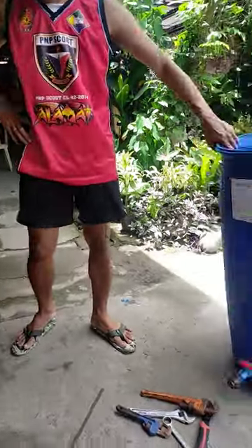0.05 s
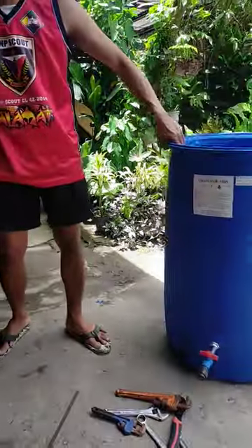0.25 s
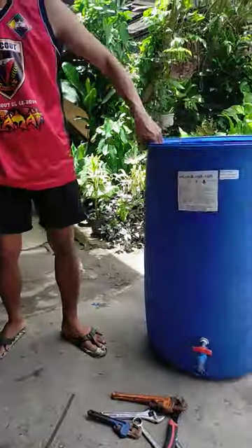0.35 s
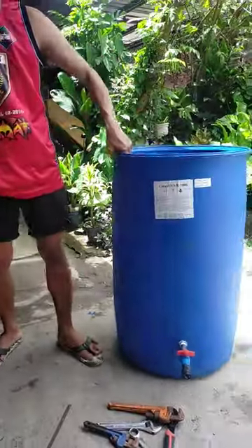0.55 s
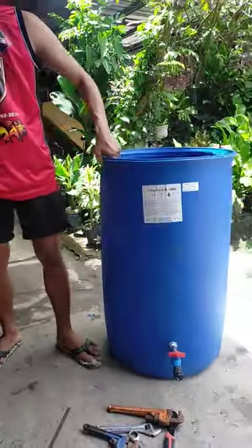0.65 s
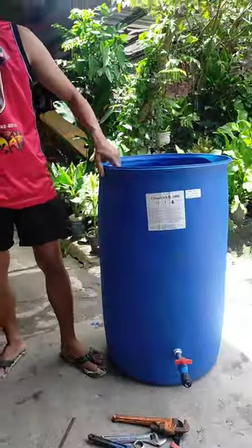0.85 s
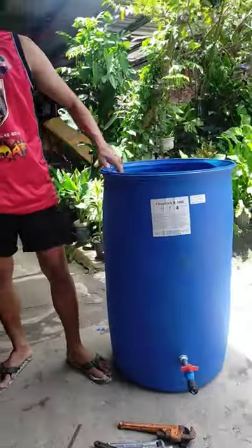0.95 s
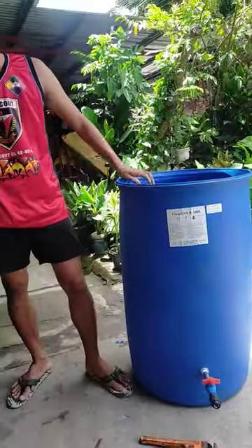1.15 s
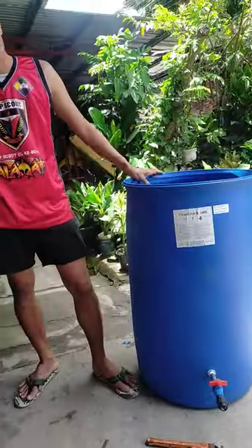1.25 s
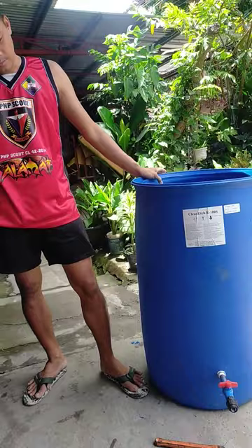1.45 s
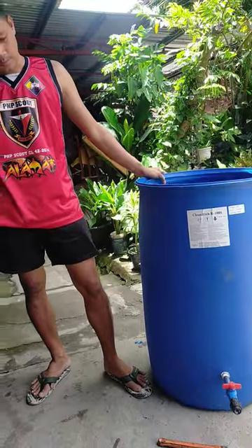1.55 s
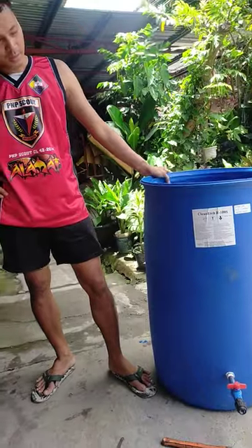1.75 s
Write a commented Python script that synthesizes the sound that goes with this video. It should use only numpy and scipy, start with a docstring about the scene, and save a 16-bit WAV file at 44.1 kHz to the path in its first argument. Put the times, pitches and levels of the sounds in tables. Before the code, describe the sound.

A hollow plastic barrel scrapes on gritty concrete, rattles with several sharp knocks and settles with low, soft bumps. One faint, dull tap follows. The microphone is close, outdoors, with quiet background rumble and hiss.

```python
"""An empty plastic drum is tipped and rolled on its bottom rim over a concrete yard.
The rim knocks four times, then chatters; each impact excites the damped modes of the hollow body.
Friction on grit makes a scrape, soft bumps set the air column humming, and the wall booms in its
two lowest flexural modes as it rolls and settles. A light, dull tap follows, over quiet outdoor noise."""
import sys
import numpy as np
from scipy import signal
from scipy.fft import rfft, irfft
from scipy.io import wavfile
from scipy.ndimage import uniform_filter1d

SR = 44100
rng = np.random.default_rng(int(sys.argv[2]) if len(sys.argv) > 2 else 0)


def waveform_to_disk(signal):
    """Save audio, clipped to [-1, 1], as 16-bit WAV at the path in sys.argv[1]."""
    frames = np.transpose(np.atleast_2d(signal))
    scaled = np.clip(frames, -1, 1) * 32767
    samples = np.round(scaled).astype(np.int16)
    wavfile.write(sys.argv[1], SR, samples)


N = 79380

# Spectral envelopes: f/Hz, relative level/dB
YARD_SPECTRUM = [(25, -10.5), (60, 5.5), (85, 1), (130, 1.5), (200, -9), (280, -6), (520, -19), (800, -16),
                 (2000, -18), (3200, -22), (5300, -30.5), (8000, -32), (10000, -37), (15500, -33.5)]  # outdoor air
TAP_SPECTRUM = [(100, -15), (250, -39), (370, 5), (480, -4.5), (720, -5.5), (950, -20), (1400, -18),
                (2500, -30), (8000, -42)]  # final tap
THUD_SPECTRUM = [(60, -19), (150, -21), (250, -1), (450, 4), (650, 1.5), (900, -7.5), (1400, -20),
                 (2500, -29), (8000, -32)]  # hollow body
RUB_SPECTRUM = [(30, -14), (60, 5), (200, -7), (500, 6.5), (900, -7), (1400, -2.5), (2300, -7.5),
                (4000, -14.5), (12000, -29)]  # rim sliding on concrete
SAND_SPECTRUM = [(200, -6), (1300, 3.5), (3000, -1.5), (5000, -5), (8000, -8.5), (10000, -5), (15500, -1)]  # crushed grit
CRACK_SPECTRUM = [(100, 6), (400, 1), (850, -3), (1400, 2.5), (2200, -1), (3000, 0), (4300, -7.5),
                  (7000, -11), (10000, -16), (15500, -18)]  # hard rim contact
# Normal modes of the drum: f/Hz, level/dB, T60/s
DRUM_MODES = [(173.4, -11, 0.6), (210, -5, 0.45), (268.4, -15.5, 0.46), (317.4, -4, 0.22),
              (355.5, -6, 0.45), (462, 2.5, 0.21), (603.5, -9.5, 0.29), (740, -11, 0.24), (1089, -4, 0.07),
              (1364, -11, 0.064), (1965, 7.5, 0.033), (2490, -9.5, 0.13), (3370, -21, 0.17)]
# Short resonances of the rim: f/Hz, width/Hz, boost/dB
RIM_RESONANCES = [(1084, 59, 5), (2060, 350, 3), (3200, 42, -0.5), (5550, 110, 3), (7950, 1200, 8)]
# Envelopes of the two lowest wall modes: t/s, lower level/dB, upper level/dB
BOOM_LEVELS = [(0, -60, -56), (.1, -66, -66), (.23, -67, -62), (.275, -57, -31.5), (.32, -51, -34),
               (.365, -31, -25.5), (.48, -31.5, -36), (.62, -39.5, -39.5), (.77, -29.5, -33.5),
               (.87, -40.5, -41), (.945, -31.5, -26), (1.04, -37.5, -33), (1.11, -50, -39),
               (1.18, -48, -48.5), (1.25, -89, -53.5), (1.8, -105, -77)]
# Soft contacts in tipping and settling: t/s, thud/dB, ring/dB, panel f/Hz, panel/dB, air column/dB
SOFT_BUMPS = [(0.271, -43, -44, 112, -21.5, -53), (0.743, -46, -34.5, 115.6, -21.5, -58),
              (.797, -38, -40, 174, -29.5, -35.5), (.925, -41.5, -42, 252.4, -31.5, -37.5)]
# Envelopes of the scrape: t/s, rub level/dB, grit level/dB
SCRAPE_LEVELS = [(0, -50, -54.5), (.085, -62.5, -52.5), (.1, -45.5, -41.5), (.19, -38.5, -45),
                 (.28, -27, -32.5), (.32, -30.5, -46.5), (.42, -42, -74), (.52, -49, -45),
                 (.70, -36.5, -47.5), (.78, -41, -46), (.86, -47.5, -53), (.91, -41, -60), (.96, -52, -64),
                 (1.02, -58.5, -74), (1.2, -70, -109)]
# Grit crushed under the rim: t/s, level/dB, duration/s
GRIT_CRACKS = [(0.0904, -29.5, 0.0027), (0.146, -37.5, 0.003), (0.16, -41.5, 0.012), (0.203, -25.5, 0.0073),
               (0.24, -37, 0.014), (0.275, -27.5, 0.0013), (0.302, -35, 0.0014), (0.623, -29.5, 0.0018),
               (0.664, -37, 0.0025), (0.712, -38, 0.0023), (0.738, -36.5, 0.006), (0.806, -53, 0.013),
               (0.889, -44.5, 0.027)]
# Rim impacts: t/s, crack/dB, relative treble/dB, thud/dB, ring/dB, ring tilt/(dB per octave),
# contact time/s, lower spot f/Hz, upper spot f/Hz, spot/dB, panel f/Hz, panel/dB
RIM_KNOCKS = [(0.3315, -18, -1.5, -18, -21, -3, 0.0059, 1270, 1620, -15.5, 606.6, -14),
              (.4470, -17, 2, -35, -19.5, 1, 0.013, 2072, 3350, -16.5, 1061, -37),
              (0.5335, -20.5, 1, -29, -23.5, 3.5, 0.0034, 2170, 2454, -16, 597, -20),
              (0.6068, -17.5, 0, -34, -22, 4, 0.0059, 1441, 1890, -17, 602, -16.5),
              (0.622, -50.5, 8, -26, -38, 0, 0.002, 1078, 2480, -26, 458, -20),
              (0.668, -34.5, 4.5, -44, -28.5, 2, 0.015, 1400, 2020, -40, 466, -31),
              (.716, -40, 15, -41, -35, -5, 0.0031, 2290, 2770, -28, 408.5, -30)]

YARD_DB, RUMBLE_HZ = -48, 405
MODE_DRIFT, DRIFT_PER_S = 0.0115, 27  # rms fractional shift of the modes, and its rate
TILT_PIVOT_HZ, RING_SWELL_S, ATTACK_S = 434, 0.0057, 0.0039
AIR_HZ, AIR_T60_S = 371, 0.7  # air column in the drum
PANEL_T60_S, SPOT_T60_S = 0.14, 0.057
CAVITY_WIDTH_HZ, CAVITY_MAX_BOOST_DB, CAVITY_TOP_HZ = 90, 4, 800
BOOM_LOWER_HZ, BOOM_UPPER_HZ, BOOM_WANDER = 51.93, 84.26, 0.023
RUB_RING_DB, SHELL_DB = -8, -7  # relative to the rub and to the crack
ECHO_S, ECHO_DB = 0.00204, -15.5
CRACK_FALL_S, THUD_LAG_S, TREBLE_HZ = 0.011, 0.0014, 3900
LOW_CUT_HZ, TOP_HZ, CEILING = 31, 15700, 0.52


def undb(db):
    """Amplitude ratio of a level in decibels."""
    return 10 ** (np.asarray(db) / 20)


def unit(x):
    """Normalisation to rms 1."""
    return x / np.sqrt(np.mean(x ** 2))


def decay(age, t60):
    """Exponential damping: 60 dB lost in t60 seconds."""
    return np.exp(-np.log(1000) * age / t60)


def curve(table, column):
    """Gain over time, by linear interpolation of a dB column."""
    rows = np.array(table)
    return undb(np.interp(np.arange(N) / SR, rows[:, 0], rows[:, column]))


def lowpass(x, hz):
    """Zero-phase filtering, so that x minus the result is the upper band."""
    return signal.sosfiltfilt(signal.butter(2, hz, fs=SR, output="sos"), x)


def colour(x, spectrum, peaks=()):
    """Source-filter shaping by a spectral envelope and resonance peaks; rms 1."""
    f = np.fft.rfftfreq(N, 1 / SR) + 1
    rows = np.array(spectrum)
    db = np.interp(np.log(f), np.log(rows[:, 0]), rows[:, 1])
    for hz, width, boost in peaks:
        db = db + boost / (1 + (2 * (f - hz) / width) ** 2)
    return unit(irfft(rfft(x) * undb(db), N))


def grains(per_s, spread_db):
    """Shot noise: dense, tiny contacts of uneven size."""
    impulses = rng.standard_normal(N) * (rng.random(N) < per_s / SR)
    return impulses * undb(spread_db * rng.standard_normal(N))


def wander(per_s):
    """Random modulation: noise smoothed over about 1 / per_s seconds; rms 1."""
    width = int(SR / per_s)
    return unit(uniform_filter1d(uniform_filter1d(rng.standard_normal(N), width), width))


def blow(start, hold, fall, tail_db, t60, attack=ATTACK_S):
    """Impact envelope: attack, hold in contact, quick fall and a reverberant tail from the drum."""
    age = np.arange(N) / SR - start
    released = np.maximum(age - hold, 0)
    tail = undb(tail_db) * decay(released, t60)
    return np.clip(age / attack, 0, 1) * np.hypot(np.exp(-released / fall), tail)


def yard():
    """Ambient noise: low rumble and leafy hiss under independent amplitude modulation."""
    air = undb(YARD_DB) * colour(rng.standard_normal(N), YARD_SPECTRUM)
    rumble = lowpass(air, RUMBLE_HZ)
    return rumble * undb(1.5 * wander(10)) + (air - rumble) * undb(0.8 * wander(14))


def tone(start, hz, t60):
    """Damped oscillator: one struck resonance swells quickly and dies away."""
    age = np.maximum(np.arange(N) / SR - start, 0)
    return np.sin(2 * np.pi * hz * age) * (1 - np.exp(-age / ATTACK_S)) * decay(age, t60)


def ring(force, tilt_db=0):
    """Modal superposition: a force drives the drum's modes; harder contact favours the upper ones."""
    t = np.arange(N // 2) / SR
    flexed_time = np.cumsum(1 + MODE_DRIFT * wander(DRIFT_PER_S)[:len(t)]) / SR  # flexing shifts pitch
    response = 0
    for hz, db, t60 in DRUM_MODES:
        gain = undb(db + tilt_db * np.log2(hz / TILT_PIVOT_HZ))
        response += gain * np.sin(2 * np.pi * hz * flexed_time) * decay(t, t60)
    return signal.fftconvolve(force, response * (1 - np.exp(-t / RING_SWELL_S)))[:N]


def strike(start, db, tilt_db):
    """Impulse response of the modes to one push."""
    push = np.zeros(N)
    push[int(start * SR)] = undb(db)
    return ring(push, tilt_db)


def tap():
    """Free decay: a light, dull tap on the standing drum leaves the air column humming."""
    noise = colour(rng.standard_normal(N), TAP_SPECTRUM)
    start = 1.326
    thud = undb(-41.5) * noise * blow(start, hold=0.017, fall=0.043, tail_db=-6, t60=0.37)
    return thud + strike(start, db=-50, tilt_db=-3.5) + undb(-51) * tone(start, AIR_HZ, AIR_T60_S)


def boom():
    """Flexural vibration: the wall's two lowest modes, whose pitch wanders with the load."""
    out = np.zeros(N)
    for hz, column in ((BOOM_LOWER_HZ, 1), (BOOM_UPPER_HZ, 2)):
        phase = 2 * np.pi * np.cumsum(hz * (1 + BOOM_WANDER * wander(44))) / SR
        out += np.sqrt(2) * curve(BOOM_LEVELS, column) * np.sin(phase)
    return out


def hollow():
    """Cavity resonance: the noise of air and wall gathers around the strong low modes."""
    peaks = [(hz, CAVITY_WIDTH_HZ, CAVITY_MAX_BOOST_DB * undb(min(db, 0) / 2))
             for hz, db, _ in DRUM_MODES if hz < CAVITY_TOP_HZ]
    return colour(rng.standard_normal(N), THUD_SPECTRUM, peaks)


def bumps():
    """Soft impacts excite mainly low frequencies: a thud, a faint ring, panel and air column tones."""
    thud = hollow()
    out = np.zeros(N)
    for start, thud_db, ring_db, panel_hz, panel_db, air_db in SOFT_BUMPS:
        out += undb(thud_db) * thud * blow(start, hold=0.0058, fall=0.043, tail_db=-4.5, t60=0.3)
        out += strike(start, ring_db, tilt_db=-0.5)
        out += undb(panel_db) * tone(start, panel_hz, PANEL_T60_S)
        out += undb(air_db) * tone(start, AIR_HZ, AIR_T60_S)
    return out


def scrape():
    """Friction noise: the rim grinds unevenly over concrete, driving the modes and cracking grit."""
    rub = colour(grains(2500, spread_db=0), RUB_SPECTRUM, RIM_RESONANCES)
    rub *= curve(SCRAPE_LEVELS, column=1) * undb(1.43 * wander(71))
    sand = colour(grains(5500, spread_db=0.5), SAND_SPECTRUM, RIM_RESONANCES)
    sand_gain = curve(SCRAPE_LEVELS, column=2) * undb(2.4 * wander(110))
    for start, db, hold in GRIT_CRACKS:
        burst = undb(db) * blow(start, hold, fall=0.0037, tail_db=-9, t60=0.27, attack=0.0019)
        sand_gain = np.hypot(sand_gain, burst)  # powers add
    return rub + sand * sand_gain + undb(RUB_RING_DB) * np.std(rub) * unit(ring(rub))


def echo(x):
    """Comb filtering by a short reflection inside the drum and its weaker repeat; rms 1."""
    lag, gain = int(ECHO_S * SR), undb(ECHO_DB)
    return unit(x + gain * np.roll(x, lag) + gain ** 2 * np.roll(x, 2 * lag))


def shell(count=56, lowest_hz=1100, highest_hz=15000):
    """High modal density: many close upper modes of the plastic wall sound together."""
    t = np.arange(N) / SR
    places = (np.arange(count) + rng.random(count)) / count
    modes_hz = lowest_hz * (highest_hz / lowest_hz) ** places
    tones = sum(np.sqrt(hz) * np.sin(2 * np.pi * (hz * t + rng.random())) for hz in modes_hz)
    return colour(tones, CRACK_SPECTRUM, RIM_RESONANCES)


def spot(start, lower_hz, upper_hz):
    """Local resonance: the struck patch of wall clacks at two pitches of its own."""
    return tone(start, lower_hz, SPOT_T60_S) + undb(1.5) * tone(start, upper_hz, SPOT_T60_S)


def knocks():
    """Hard impacts excite a broad band: the rim crunches, the wall rings and the cavity thuds."""
    crunch = echo(colour(grains(9000, spread_db=1), CRACK_SPECTRUM, RIM_RESONANCES))
    wall = echo(shell())
    crunch_low, wall_low = lowpass([crunch, wall], TREBLE_HZ)
    crunch_high, wall_high = crunch - crunch_low, wall - wall_low
    thud = hollow()
    out = np.zeros(N)
    for (start, db, treble_db, thud_db, ring_db, tilt_db, hold,
         lower_hz, upper_hz, spot_db, panel_hz, panel_db) in RIM_KNOCKS:
        crack_gain, treble = undb(db), undb(treble_db)
        crack = crunch_low * blow(start, hold, CRACK_FALL_S, tail_db=-9, t60=0.42)
        crack += treble * crunch_high * blow(start, hold, CRACK_FALL_S, tail_db=-8.5, t60=0.28)
        wall_ring = (wall_low + treble * wall_high) * blow(start, hold, CRACK_FALL_S, tail_db=-9, t60=0.17)
        out += crack_gain * (crack + undb(SHELL_DB) * wall_ring)
        out += undb(thud_db) * thud * blow(start + THUD_LAG_S, hold, fall=0.048, tail_db=-10.5, t60=0.43)
        out += strike(start, ring_db, tilt_db)
        out += undb(spot_db) * spot(start, lower_hz, upper_hz)
        out += undb(panel_db) * tone(start, panel_hz, PANEL_T60_S)
    return out


def scene():
    """Linear superposition of the drum and the yard, in mono."""
    return (knocks() + scrape() + bumps() + tap() + boom() + yard())[None]


def record(dry):
    """Band limiting and soft saturation thin the deepest bass, round the peaks and cut the top."""
    thin = signal.sosfilt(signal.butter(3, LOW_CUT_HZ, "high", fs=SR, output="sos"), dry)
    rounded = CEILING * np.tanh(thin / CEILING)
    return signal.sosfilt(signal.ellip(10, 0.2, 80, TOP_HZ, fs=SR, output="sos"), rounded)


dry = scene()
out = record(dry)
waveform_to_disk(out)
```